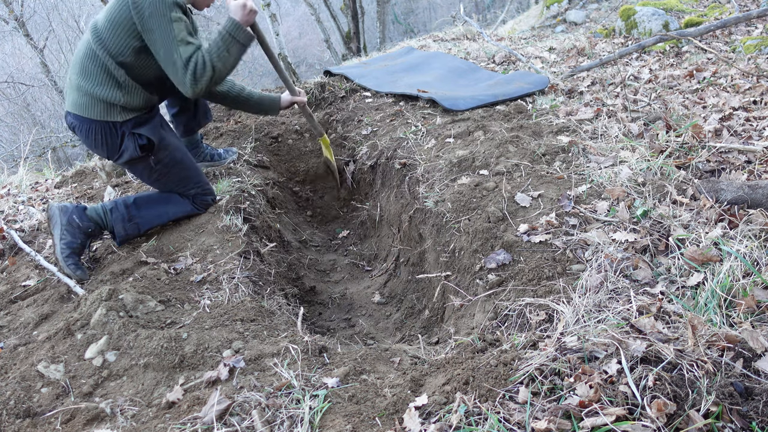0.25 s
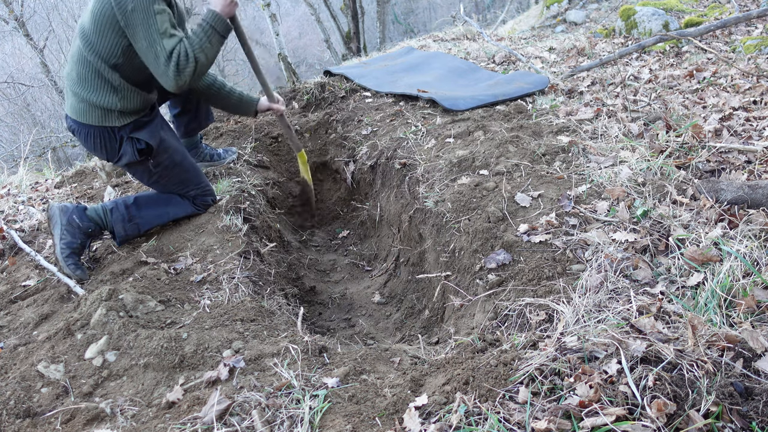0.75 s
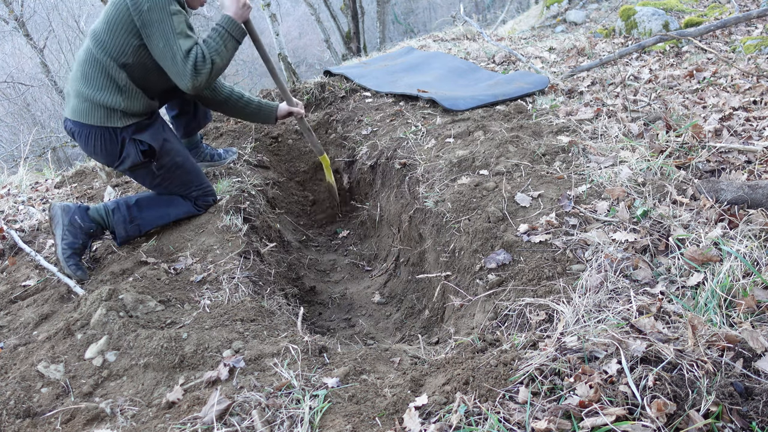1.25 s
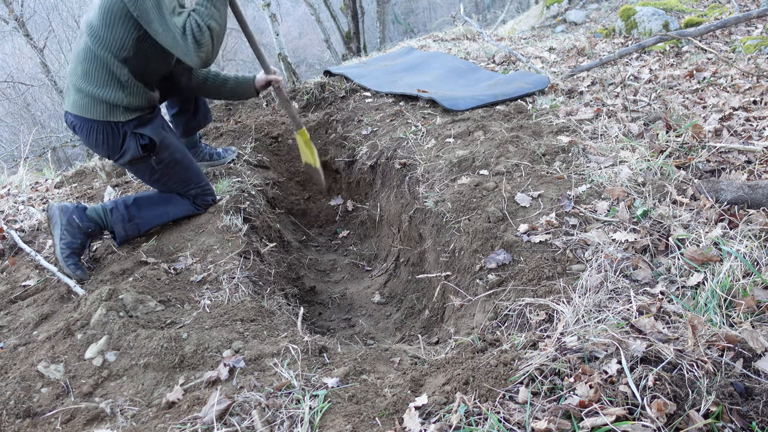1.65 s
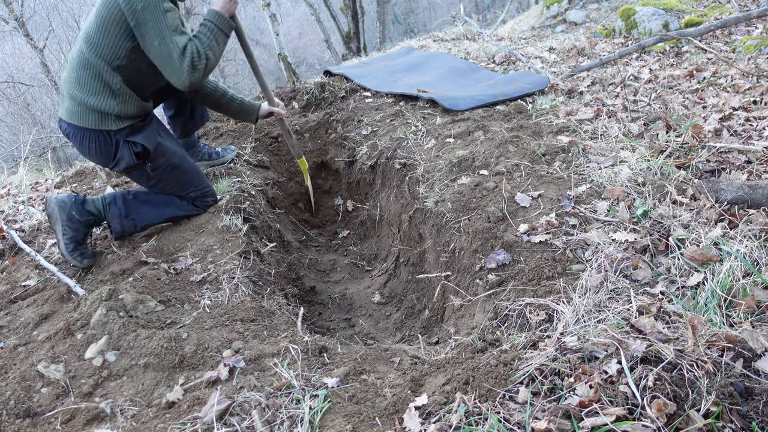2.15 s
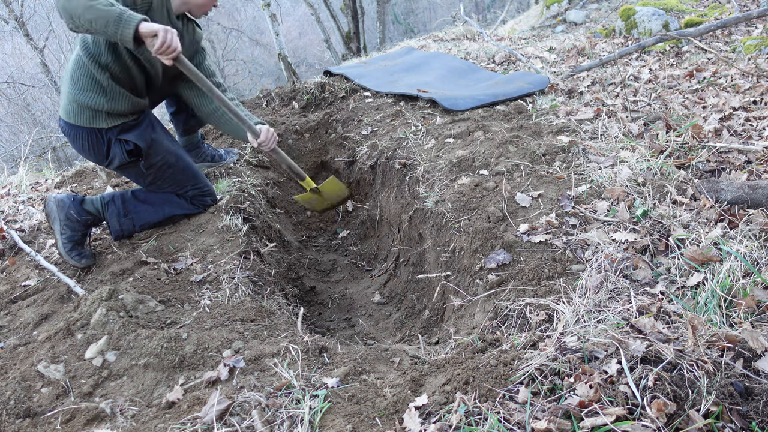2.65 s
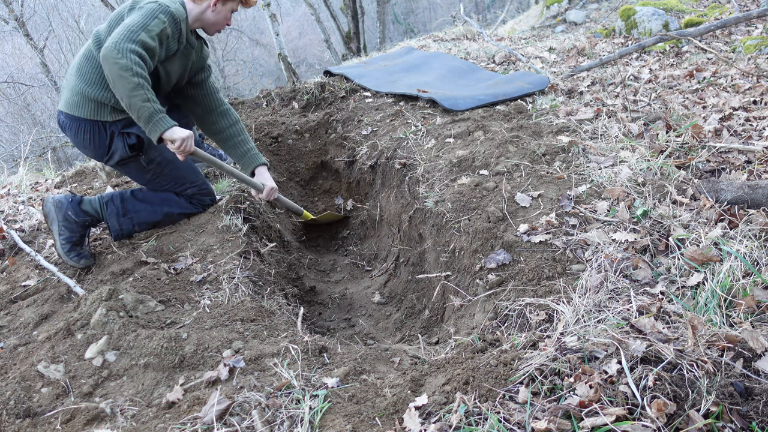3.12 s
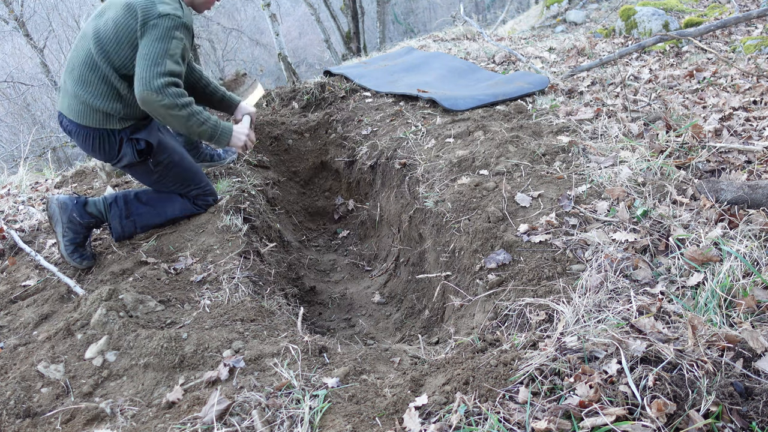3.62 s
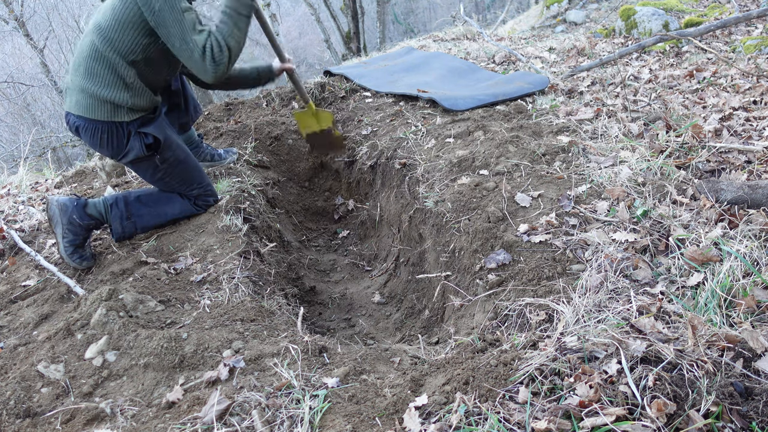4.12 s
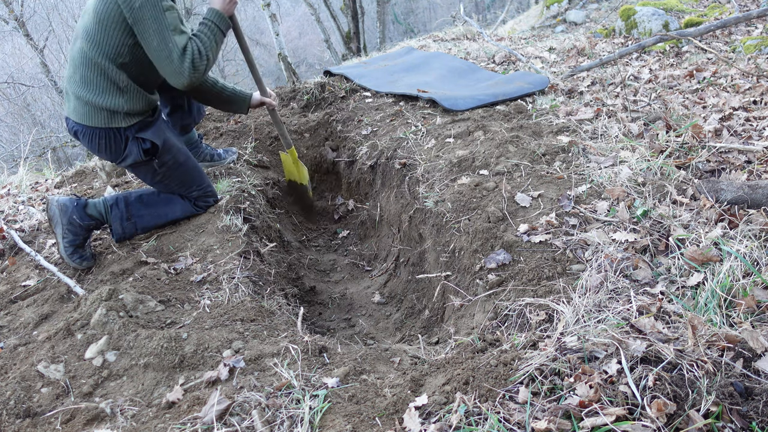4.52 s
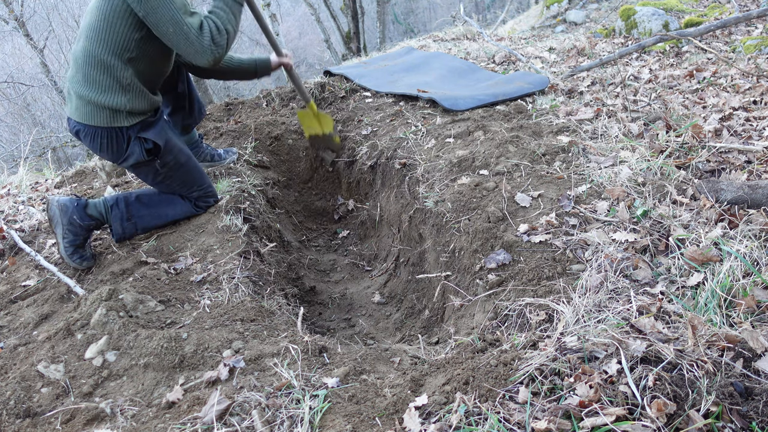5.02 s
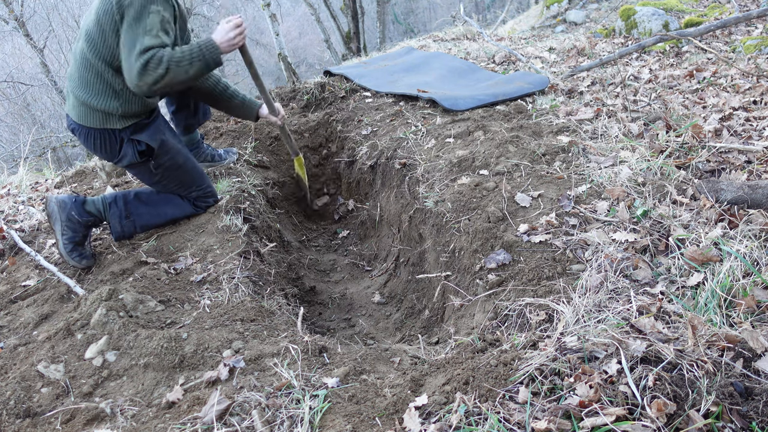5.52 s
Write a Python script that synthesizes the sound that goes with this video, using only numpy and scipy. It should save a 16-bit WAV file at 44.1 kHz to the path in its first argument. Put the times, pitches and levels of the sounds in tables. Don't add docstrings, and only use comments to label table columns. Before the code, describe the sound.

Outdoors on a wooded slope, a steel shovel a few metres from a small stereo microphone jabs stony earth. Crunchy strokes with sharp stone cracks and short damped clinks come unevenly, each with a soft ground thump and sliding grit. After a quieter gap, a hard pry rings and clatters loudest, then smaller strokes follow. A faint steady roar lies far behind.

```python
import sys
import numpy as np
from scipy import signal
from scipy.io import wavfile
from scipy.ndimage import uniform_filter1d

SR = 44100
rng = np.random.default_rng(int(sys.argv[2]) if len(sys.argv) > 2 else 0)


def master(y):
    cut = np.clip(np.atleast_2d(y).T, -1, 1)
    pcm = np.round(cut * 32767)
    wavfile.write(sys.argv[1], SR, pcm.astype(np.int16))


def volts_from_db(level):
    exponent = np.asarray(level, float) / 20
    return 10 ** exponent


N = 254456


def rms_one(x):
    return x / np.sqrt(np.mean(x ** 2) + 1e-20)


def at_hz(points, hz):
    point_hz, point_db = np.transpose(points)
    return np.interp(np.log(hz), np.log(point_hz), point_db)


def band(x, low_hz, high_hz, order=2):
    return signal.sosfilt(signal.butter(order, [low_hz, high_hz], "band", fs=SR, output="sos"), x)


def resonance(x, hz, width_hz):
    r = np.exp(-np.pi * width_hz / SR)
    poles = [1, -2 * r * np.cos(2 * np.pi * hz / SR), r * r]
    return signal.lfilter([(1 - r * r) / 2, 0, (r * r - 1) / 2], poles, x)


def drift(rate):
    r = np.exp(-80 * np.pi * rate / SR)
    chance = rng.standard_normal(N // 40 + 2002)
    slow = signal.lfilter([1], [1, -2 * r, r * r], chance)[2000:]
    return np.interp(np.arange(N) / 40, np.arange(len(slow)), rms_one(slow))


def add(out, s, piece):
    i = round(s * SR)
    out[i:i + len(piece)] += piece[:N - i]


# pitch_hz, density_db_per_hz
VALLEY_SPECTRUM = [(15, -67), (25, -52), (53, -22.5), (277, -8), (363, -7.5), (463, -6), (591, -4),
                   (1100, -5), (1190, -7.5), (1440, -4), (2000, -13.5), (2760, -19.5), (5140, -26.5),
                   (16000, -38)]
# pitch_hz, likeness
VALLEY_COHERENCE = [(60, 0.83), (500, 0.84), (2000, 0.23), (6000, 0.18), (14000, 0.3)]


def valley():
    out, together = 0, drift(1.2)
    edges = 24 * 2 ** np.arange(0, 9.6, .5)
    white = rng.standard_normal((2, 2, N))
    for k, (low, high) in enumerate(zip(edges, edges[1:])):
        mid, side = band(white[k % 2], low, high)
        centre_hz = np.sqrt(low * high)
        alike = np.clip(at_hz(VALLEY_COHERENCE, centre_hz), -1, 1)
        gain = volts_from_db(at_hz(VALLEY_SPECTRUM, centre_hz) + 0.4 * together + 1.1 * drift(3.0))
        out = out + gain * (np.sqrt(1 + alike) * mid + np.sqrt(1 - alike) * side * [[1], [-1]])
    level_db = -55
    return volts_from_db(level_db) * rms_one(out)


# start_s, length_s, pitch_hz, fall_hz, level_db
BIRD_CALL = (3.09, .1, 8750, 350, -76)


def bird():
    s, length, hz, fall_hz, db = BIRD_CALL
    out, t = np.zeros(N), np.arange(round(length * SR)) / SR
    swell = np.sin(np.pi * t / length) * np.cos(1.7 * np.pi * t / length)
    cycles = hz * t - fall_hz * t ** 2 / (2 * length)
    add(out, s, volts_from_db(db) * swell * np.sin(2 * np.pi * cycles))
    return out


# start_s, level_db
GROUND_THUMPS = [(0.273, -57), (0.546, -61.5), (1.115, -50.5), (1.455, -57.5), (1.858, -51.5), (2.089, -54),
                 (2.159, -60), (2.889, -53.5), (3.249, -61.5), (4.163, -49.5), (4.503, -57), (5.056, -58),
                 (5.31, -60.5), (5.429, -66)]


def thumps():
    out, t = np.zeros(N), np.arange(round(.3 * SR)) / SR
    earth = rms_one(band(rng.standard_normal(N), 130, 227))
    deep = rms_one(band(rng.standard_normal(N), 52, 98))
    for s, db in GROUND_THUMPS:
        add(out, s, volts_from_db(db - 7.0) * (t / 0.0037) * np.exp(1 - t / 0.014))
    deep_db, deep_lag_s = -11, .025
    late = np.roll(out, round(deep_lag_s * SR))
    return band(out * earth + volts_from_db(deep_db) * late * deep, 50, 900)


def grains(per_s, spread_db, hiss, cycles=4.9):
    sizes = volts_from_db(spread_db * np.minimum(rng.exponential(1, N), 4)) * rng.choice([-1, 1], N)
    clicks = sizes * (rng.random(N) < per_s / SR)
    dealt, rung = rng.integers(0, 18, N), 0
    for k, hz in enumerate(np.geomspace(300, 14500, 18)):
        soft = resonance(clicks * (dealt == k) + 1e-18, hz, hz / 3)
        rung = rung + rms_one(resonance(soft, hz, hz / cycles)) * np.sqrt(hz)
    return rms_one(rms_one(rung) + hiss * rng.standard_normal(N))


# start_s, hold_s, level_db
GRIT_SLIDES = [(0.48, 0.16, -43.5), (1.315, 0.22, -48.5), (1.97, 0.079, -45), (2.34, 0.032, -50.5),
               (3.12, 0.06, -58.5), (3.324, 0.12, -52.5), (4.363, 0.01, -26.5), (4.583, 0.0087, -45),
               (2.546, 0.062, -59), (3.524, 0.058, -59), (5.126, 0.063, -41.5), (5.234, 0.022, -48),
               (5.429, 0.19, -43.5)]


def sliding():
    t, (s, hold, db) = np.arange(N) / SR, np.transpose(GRIT_SLIDES)[:, :, None]
    rise_db_per_s, fall_db_per_s, resting_db = 260, 148, -66
    loss_db = rise_db_per_s * np.maximum(s - t, 0) + fall_db_per_s * np.maximum(t - s - hold, 0)
    return volts_from_db(resting_db) + volts_from_db(db - loss_db).sum(axis=0)


def grit():
    flow = grains(per_s=8000 * volts_from_db(5.3 * drift(20)), spread_db=4.0, hiss=1.0)
    flow = flow * volts_from_db(1.3 * drift(38)) * sliding()
    earth_db, sharp_db = -6.5, -17.5
    earthy = volts_from_db(earth_db + 7.0) * band(flow, 246, 1760)
    sharp = volts_from_db(sharp_db + 12.5) * band(flow, 4240, 11100)
    return band(flow, 960, 5570) + earthy + sharp


# pitch_hz, level_db, t60_s
BLADE_MODES = [(385, 0, 0.37), (602, -6, 0.3), (873, -20, .15), (955, 2, 0.17), (1100, -20, 0.09),
               (1220, 0, 0.033), (1320, 2, 0.3), (1382, -2, 0.2), (1468, 9, .22), (1700, 4.5, 0.23),
               (1758, 3, 0.4), (1862, 0.5, 0.56), (1974, 5.5, 0.25), (2110, -4, 0.043), (2278, -1, 0.3),
               (2362, -3, 0.25), (2483, 4, 0.27), (2571, -2, 0.3), (2600, -20, .1), (3118, -7, 0.19),
               (3370, -20, 0.11), (3900, -10.5, .05), (3820, -18, 0.051), (4490, -10.5, 0.031),
               (4950, -25, .06), (5200, -1, .06), (6800, -40, 0.065), (7000, -8, .05)]


def buried_blade(force, damp):
    out = 0
    for k, (hz, db, t60) in enumerate(BLADE_MODES[1:]):
        out = out + volts_from_db(db) * resonance(force, hz, damp * hz) * (-1) ** k
    return out


# pitch_hz, width_hz, level_db
UPPER_MODES = [(2750, 27, -5), (3060, 91, -1.5), (3330, 75, -11), (3720, 39, -3.5), (4600, 32, -12),
               (5200, 55, -5), (5500, 18, -29), (5600, 380, -14.5), (7600, 77, -18), (7900, 180, -43.5)]


def half_free_blade(force):
    out = volts_from_db(-7.5) * buried_blade(force, damp=0.011)
    for k, (hz, width_hz, db) in enumerate(UPPER_MODES):
        out = out + volts_from_db(db) * resonance(force, hz, width_hz) * (-1) ** k
    return out


# start_s, level_db, favoured_hz, free_s
FREE_RINGS = [(0.540, -16, 4950, 0.0057), (0.603, -34, 1710, 0.0083), (1.116, -17, 1283, 0.0067),
              (1.463, -41.5, 2510, 0.027), (1.460, -46, 1900, 0.033), (2.062, -29, 1220, 0.01),
              (2.091, -18, 2110, 0.013), (2.157, -40, 1880, 0.0077), (2.324, -62, 1400, 0.03),
              (2.855, -10.5, 3120, 0.011), (3.235, -30, 2600, 0.018), (3.294, -40.5, 1520, 0.011),
              (3.292, -36.5, 2540, 0.013), (3.294, -28.5, 602, 0.01), (4.159, -16, 1600, 0.019),
              (4.191, -35.5, 955, 0.1), (4.352, -13.5, 2780, 0.1), (4.41, -16.5, 1745, 0.04),
              (4.425, -22.5, 1465, 0.024), (4.435, -20.5, 1322, 0.066), (4.44, -10, 3120, 0.02),
              (4.441, -19.5, 1930, 0.056), (4.440, -21.5, 2277, 0.056), (4.442, -30, 2483, 0.027),
              (5.061, -35, 1758, 0.03), (5.301, -26, 1550, 0.014), (5.403, -35, 2540, 0.017),
              (5.407, -41, 3365, 0.014), (5.432, -24.5, 1480, 0.038), (5.592, -54, 2483, 0.05)]
# start_s, level_db, free_s
LOWEST_MODE_HUMS = [
    (1.115, -40, 0.009),
    (1.46, -38, 0.031),
    (2.158, -49, 0.066),
    (3.237, -38, 0.033),
    (3.294, -41.5, 0.016),
    (4.443, -27.5, 0.086),
    (5.432, -46, 0.054),
]


def rings():
    out, t = np.zeros(N), np.arange(round(.3 * SR)) / SR
    hz, mode_db, t60 = np.transpose(BLADE_MODES)[:, :, None]
    idle_hum_db = -30
    strikes = [(*row, idle_hum_db) for row in FREE_RINGS]
    strikes += [(s, db, hz[0], free_s, 0) for s, db, free_s in LOWEST_MODE_HUMS]
    phases = rng.uniform(0, 2 * np.pi, (len(strikes), len(BLADE_MODES), 1))
    flutter = volts_from_db(1.5 * drift(50))
    for k, ((s, db, favoured_hz, stop_s, lowest_db), phase) in enumerate(zip(strikes, phases)):
        strength_db = mode_db - 110 * np.minimum(np.abs(np.log2(hz / favoured_hz)), .22)
        strength_db[0] = lowest_db
        share = max(0.061 + 16.4 * stop_s, .05)
        modes = volts_from_db(strength_db - 60 * t / (t60 * share)) * np.sin(2 * np.pi * hz * t + phase)
        modes[1:] *= flutter[6000 * k:][:len(t)]
        choke = volts_from_db(-60 * np.maximum(t - stop_s, 0) / 0.045)
        onset = 1 - np.exp(-t / (0.026 * stop_s))
        add(out, s, volts_from_db(db) * modes.sum(axis=0) * onset * choke)
    return out


# start_s, level_db, pitch_hz, t60_s
WEDGED_NOTES = [(0.2767, -24.5, 1480, 0.04), (0.54, -15.5, 1920, 0.039), (.605, -24, 1735, 0.034),
                (1.107, -23, 1200, 0.02), (1.1159, -14.5, 1150, 0.028), (1.136, -37, 1410, 0.054),
                (1.832, -26, 1810, 0.06), (1.848, -25, 3900, 0.057), (1.853, -16, 1257, 0.022),
                (2.076, -15, 1213, 0.043), (2.089, -12.5, 2466, .04), (2.089, -17, 1857, 0.063),
                (2.138, -23, 4000, 0.044), (2.154, -28, 1690, .03), (2.154, -22, 2050, .03),
                (2.159, -18.5, 3367, 0.042), (2.164, -22, 4330, 0.043), (2.325, -40, 1695, 0.24),
                (2.876, -19, 3330, 0.057), (2.908, -41, 3740, .2), (3.237, -18, 6900, .04),
                (4.312, -24, 1127, 0.062), (4.312, -24, 890, 0.057), (4.312, -24.5, 2540, 0.056),
                (4.346, -18.5, 1075, 0.074), (4.345, -15, 2780, 0.11), (4.355, -23.5, 873, 0.11),
                (4.366, -18.5, 2317, 0.15), (4.37, -19, 3720, .08), (4.407, -19, 2750, 0.12),
                (4.42, -26.5, 643, 0.12), (4.499, -19.5, 3370, 0.063), (4.5, -18, 3710, 0.06),
                (5.039, -23, 1230, 0.025), (5.05, -21, 2200, .04), (5.304, -19.5, 1350, 0.032),
                (5.405, -22, 2560, 0.084), (5.404, -21, 3380, 0.065), (5.404, -23.5, 1970, 0.083),
                (5.436, -24, 2796, .09), (5.436, -28, 3110, .08), (5.435, -16, 4850, 0.046),
                (5.49, -26.5, 3070, 0.054), (5.49, -26.5, 5430, .06), (5.592, -37, 1452, 0.22),
                (5.593, -42, 2300, .15)]
# start_s, level_db, pitch_hz, t60_s
DRAGGED_NOTES = [(.541, -18, 4800, 0.034), (.592, -38, 1712, .12), (2.06, -27, 1850, .08),
                 (2.861, -23, 2500, 0.068), (2.885, -31.5, 590, 0.072), (3.249, -23, 7100, .03),
                 (4.165, -27, 2600, 0.083), (4.166, -16.5, 1560, .1), (4.185, -23, 1600, 0.057),
                 (4.35, -21.5, 3200, .04), (4.385, -23.5, 3120, 0.1), (4.412, -23.5, 3400, .1),
                 (4.425, -23, 2160, .1), (4.39, -24.5, 890, 0.18), (5.041, -23, 950, 0.063),
                 (5.352, -33, 1700, 0.051), (5.433, -20, 1390, 0.084), (5.493, -27, 4000, .05),
                 (5.475, -34, 970, 0.15), (1.068, -33, 4200, .04), (1.072, -30, 1400, .06),
                 (1.085, -29.5, 1300, .05), (.542, -19.5, 2600, .04), (2.093, -17.5, 1200, .05),
                 (4.445, -24, 2490, .2), (4.43, -18.5, 1400, 0.14), (4.355, -20, 3100, .1),
                 (1.461, -43, 1850, .1), (1.461, -36, 2470, 0.086), (.538, -18, 5300, .028),
                 (4.44, -23, 1470, .2), (5.555, -46, 1450, .3)]


def pings():
    out, t, waver = np.zeros(N), np.arange(round(.25 * SR)) / SR, drift(60)
    wedged_flutter_db, dragged_flutter_db, rise_s = 1.5, 3.5, 0.0014
    notes = [(*row, wedged_flutter_db) for row in WEDGED_NOTES]
    notes += [(*row, dragged_flutter_db) for row in DRAGGED_NOTES]
    for k, (s, db, hz, t60, flutter_db) in enumerate(notes):
        level_db = db - 60 * t / max(t60, .01) + flutter_db * waver[3000 * k:][:len(t)]
        add(out, s, volts_from_db(level_db) * (1 - np.exp(-t / rise_s)) * np.sin(2 * np.pi * hz * t))
    return out


def coloured(push, hz, earth_db, sharp_db):
    stone = resonance(push, np.clip(hz, 500, 9000), 0.36 * hz) + 0.43 * band(push, 1385, 5740)
    earthy = volts_from_db(earth_db + 5.5) * band(push, 352, 2200)
    return stone + earthy + volts_from_db(sharp_db + 1.0) * band(push, 4150, 10380)


# start_s, length_s, level_db, pitch_hz
CHOP_GRAVEL = [(0.256, 0.027, -25, 3330), (0.273, 0.011, -26, 1540), (1.06, 0.034, -24.5, 2560),
               (1.094, 0.029, -29, 1490), (1.104, 0.0057, -20, 2310), (1.117, 0.059, -39, 1180),
               (1.81, 0.029, -36.5, 2440), (1.82, 0.031, -29, 3830), (1.841, 0.017, -30, 3650),
               (1.866, 0.015, -33.5, 1960), (2.854, 0.036, -18.5, 3200), (2.898, 0.0066, -25, 890),
               (4.149, 0.043, -21.5, 1400), (4.188, 0.085, -38, 1900), (5.039, 0.014, -16, 1440),
               (5.051, 0.0067, -19.5, 2680), (5.068, 0.018, -28.5, 2670)]
# start_s, length_s, level_db, pitch_hz
PRY_GRAVEL = [(0.53, 0.013, -22.5, 2950), (0.549, 0.073, -31, 3900), (1.364, 0.12, -40.5, 3720),
              (2.049, 0.037, -24, 1460), (2.092, 0.055, -24, 3500), (2.158, 0.015, -24, 3800),
              (2.629, 0.03, -63, 5800), (2.978, 0.1, -49, 3380), (3.219, 0.026, -32, 3320),
              (3.234, 0.01, -25, 4000), (3.953, 0.078, -56.5, 7240), (4.31, 0.013, -21.5, 1070),
              (4.334, 0.03, -15, 2750), (4.365, 0.017, -18.5, 3650), (4.373, 0.032, -17.5, 1330),
              (4.404, 0.036, -20, 2200), (4.413, 0.014, -30.5, 720), (4.497, 0.026, -22.5, 3270),
              (4.506, 0.044, -36.5, 3530), (5.243, 0.07, -36, 3650), (5.319, 0.012, -23.5, 3620),
              (5.347, 0.011, -30, 1860), (5.383, 0.0068, -39, 6100), (5.421, 0.032, -19.5, 3420),
              (5.467, 0.04, -28.5, 2780)]


def crunches():
    out = np.zeros((2, N))
    force = grains(per_s=8000 * volts_from_db(3.0 * drift(60)), spread_db=3.0, hiss=0.61) * volts_from_db(1.67 * drift(120))
    force = force / np.sqrt(uniform_filter1d(force ** 2, size=3000))
    crumbs, t = rng.standard_normal(N) * volts_from_db(1.5 * drift(70)), np.arange(round(.28 * SR)) / SR
    # gravel table, earthy part dB, sharp part dB
    kinds = [(CHOP_GRAVEL, -12.5, -5.5), (PRY_GRAVEL, -13.5, -7)]
    clean_from_s, clean_earth_db = 4.2, -6
    for track, (strokes, earth_db, sharp_db) in zip(out, kinds):
        for s, length, db, hz in strokes:
            i, after = round(s * SR), np.maximum(t - length, 0)
            breaking = force[i:i + len(t)] * volts_from_db(-60 * after / 0.053)
            settling = crumbs[i:i + len(t)] * volts_from_db(-14 - 60 * after / 0.29)
            push = (breaking + settling) * np.minimum(t / (0.36 * length), 1)
            low_db = earth_db + clean_earth_db * (s > clean_from_s)
            top_db = sharp_db + 8.0 * np.log2(hz / 3000)
            add(track, s, volts_from_db(db + 3) * coloured(push, hz, low_db, top_db))
    return out


# start_s, peak_db, pitch_hz
STONE_SNAPS = [(0.5391, -9, 4960), (0.5457, -12, 3470), (0.5749, -27, 6500), (1.0692, -15, 4300),
               (1.082, -17, 3060), (1.0877, -18, 5000), (1.4596, -20, 7000), (1.833, -26, 4700),
               (1.847, -12, 5900), (1.858, -23, 4600), (2.0637, -22, 2000), (2.077, -14, 1330),
               (2.1305, -20, 5500), (2.162, -9, 3460), (2.1671, -15, 4200), (2.1814, -19, 3400),
               (2.2097, -15.5, 3500), (2.324, -23, 2390), (2.8522, -24, 3350), (2.856, -13, 3100),
               (2.873, -5, 3380), (2.878, -9, 3380), (2.9135, -20, 3230), (3.2364, -21, 3500),
               (3.2396, -9, 6750), (3.249, -7, 7000), (4.1555, -18, 5500), (4.1597, -14, 2130),
               (4.162, -22, 1510), (4.1732, -25, 1670), (4.2825, -25, 2820), (4.3085, -27.5, 2760),
               (4.3147, -16, 2740), (4.318, -20, 2710), (4.337, -27, 5000), (4.3398, -18.5, 3660),
               (4.3461, -16, 2670), (4.355, -4, 2670), (4.362, -9, 2720), (4.369, -18, 3300),
               (4.3734, -2, 2520), (4.3793, -7.5, 6500), (4.3895, -3.5, 1780), (4.5045, -13, 3380),
               (4.5097, -12, 3320), (4.5229, -7, 2950), (4.672, -45.5, 7000), (5.0488, -10, 1260),
               (5.0515, -12, 2240), (5.0747, -28, 3750), (5.0824, -25, 3440), (5.2071, -33, 5080),
               (5.3032, -14.5, 1620), (5.3051, -8.5, 3170), (5.3215, -20, 4900), (5.3517, -19, 6800),
               (5.368, -21, 6590), (5.5095, -19, 4740),
               (.649, -20, 3500), (.6492, -29, 8000), (.95, -43, 6200), (3.048, -38, 4500),
               (3.161, -42, 6500), (.606, -11, 5200), (1.196, -31, 1300), (1.227, -31, 900),
               (4.4981, -15, 9000)]


def snaps():
    out, touch = np.zeros(N), np.eye(1, 400)[0]
    cycles, edge_db, level_db = 2.6, -4, -3.5
    edge = band(touch, 3340, 7500)
    edge = volts_from_db(edge_db) * edge / np.abs(edge).max()
    for s, db, hz in STONE_SNAPS:
        body = resonance(resonance(touch, hz, hz / 1.34), hz, hz / cycles)
        snap = body / np.abs(body).max() + (hz / 3000) * edge
        add(out, s, volts_from_db(db + level_db) * snap)
    return out


# start_s, peak_db, pitch_hz, earth_db
CHOP_KNOCKS = [(0.2653, -14.5, 3260, -3), (0.276, -15.5, 2360, -6.5), (1.0663, -21.5, 2390, -22),
               (1.107, -10.5, 3100, -16), (1.1146, -7, 5200, 0), (1.849, -10.5, 3650, -47),
               (1.8549, -11.5, 3530, 2), (2.8535, -14.5, 2870, -18), (2.87, -31, 3240, -19),
               (2.8768, -23, 3360, -9), (2.8879, -10, 3480, -10), (4.1615, -8.5, 2400, -6),
               (5.0391, -8.5, 2790, -9), (5.0475, -7, 2660, -2)]
# start_s, peak_db, pitch_hz, earth_db
PRY_KNOCKS = [(0.5384, -19, 2770, -34), (0.541, -9, 3220, -41), (0.6046, -10, 3460, -7.5),
              (1.4586, -16.5, 2920, -9), (2.0598, -13, 2940, -28), (2.0763, -12.5, 3550, -2),
              (2.0893, -8.5, 2100, -13.5), (2.1148, -15, 2970, -22), (2.139, -16.5, 3770, -28),
              (2.154, -9, 2150, -31), (2.1615, -23.5, 4500, 8), (3.236, -10.5, 3140, -14.5),
              (3.2491, -14.5, 5550, -3.5), (4.3104, -16, 2520, -9), (4.352, -20, 2700, -17),
              (4.412, -18.5, 3160, 13), (4.428, -20, 2270, -6), (4.5011, -2, 3280, -10),
              (4.5093, -7, 3200, -37), (4.5227, -14.5, 3130, -10), (5.303, -10, 2900, -39),
              (5.404, -4, 3270, -47), (5.4346, -5, 2250, -47), (5.4897, -23.5, 2840, 3)]
# start_s, peak_db, pitch_hz
PEBBLE_KNOCKS = [(0.479, -33, 2490), (0.6478, -27.5, 3260), (0.726, -34, 4900), (1.1925, -40, 4010),
                 (1.226, -40, 1440), (1.3093, -34.5, 6360), (1.358, -35, 2180), (1.3767, -32.5, 2800),
                 (1.4115, -25, 5760), (1.432, -30.5, 2680), (1.513, -37, 4620), (1.548, -33.5, 2990),
                 (1.927, -31, 3830), (1.9902, -32.5, 3180), (2.2088, -23.5, 3020), (2.3225, -21.5, 2350),
                 (2.361, -24, 3830), (3.2086, -31.5, 3580), (3.2906, -20, 3440), (3.43, -42, 4230),
                 (3.46, -40, 4850), (3.946, -37, 3620), (4.282, -41, 2770), (4.6244, -32.5, 4470),
                 (5.18, -28.5, 3200), (5.2058, -32.5, 5600), (5.37, -20, 6540), (5.59, -15, 2750)]


def cracks():
    # sharp part dB, rattle t60 s (pebbles first an earthy part dB)
    knocks = [(*row, -20.5, 0.026) for row in CHOP_KNOCKS]
    knocks += [(*row, -18.5, 0.035) for row in PRY_KNOCKS]
    knocks += [(*row, -15, -21.5, 0.028) for row in PEBBLE_KNOCKS]
    out, t = np.zeros(N), np.arange(round(.1 * SR)) / SR
    rattles = rng.standard_normal((len(knocks), len(t)))
    sharp_db_per_octave = 10.5
    for (s, db, hz, earth_db, sharp_db, t60), rattle in zip(knocks, rattles):
        push = rattle * (1 - np.exp(-t / 0.00096)) * volts_from_db(-60 * t / np.clip(t60, .006, .1))
        push[30] += 4.0
        top_db = sharp_db + 13.5 + sharp_db_per_octave * np.log2(hz / 3000)
        knock = coloured(push, hz, earth_db, top_db)
        add(out, s - .0004, volts_from_db(db + 4.5) * knock / np.abs(knock).max())
    return out


# start_s, level_db
SOIL_DRYNESS = [(0, 1), (.4, -3), (.98, 9), (1.7, 7), (2.0, 4), (2.865, -4), (3.15, -17), (4.0, -4),
                (4.494, 6.5), (4.9, -17), (5.2, -14)]


def dryness():
    s, db = np.transpose(SOIL_DRYNESS)
    stroke = np.searchsorted(s, np.arange(N) / SR) - 1
    return volts_from_db(db[np.clip(stroke, 0, None)])


def shovel():
    knocks, (chop, pry) = cracks() + snaps(), crunches()
    contact = knocks + chop + pry
    near = 0.7 * contact + volts_from_db(-7.5) * buried_blade(contact, damp=0.05)
    near = near + volts_from_db(4.5) * half_free_blade(pry + 0.44 * knocks)
    near = near + grit() + rings() + pings()
    finest_db, air_cut_hz = -20.5, 5170
    finest = volts_from_db(finest_db) * dryness() * band(near + 0.49 * chop, 11150, 22000)
    return signal.sosfilt(signal.butter(2, air_cut_hz, fs=SR, output="sos"), near) - finest


def hillside(x):
    t = np.arange(round(.4 * SR)) / SR
    trees_db, trees_t60_s = -23, 0.38
    scatter = band(rng.standard_normal((2, len(t))), 660, 9800, order=1)
    scatter = scatter * volts_from_db(-60 * t / trees_t60_s) * (t > .01)
    response = volts_from_db(trees_db) * scatter / np.sqrt(np.sum(scatter ** 2) / 2)
    response[:, 0] += volts_from_db([-.3, .3])
    housing = band(rng.standard_normal(len(t)) * volts_from_db(-60 * t / .008), 3700, 15000, order=4)
    housing = housing / np.sqrt(np.sum(housing ** 2))
    port_wander, left_treble = 0.55, .2
    apart = volts_from_db(-10) * signal.fftconvolve(x, housing)[:N] * (.3 + port_wander * drift(29))
    apart = apart + left_treble * band(x, 8100, 15500)
    return signal.fftconvolve(x[None], response, axes=1)[:, :N] + apart * [[1], [-1]]


def scene():
    return hillside(shovel() + thumps() + bird()) + valley()


def band_limit(x):
    return signal.sosfilt(signal.butter(12, 16430, fs=SR, output="sos"), x)


def record(dry):
    thin = signal.sosfilt(signal.butter(1, 45, "highpass", fs=SR, output="sos"), dry)
    soft = 0.96 * np.tanh(thin / 0.85)
    mix = signal.sosfilt(signal.cheby2(14, 70, 16500, fs=SR, output="sos"), soft)
    return band_limit(mix)


dry = scene()
out = record(dry)
master(out)
```